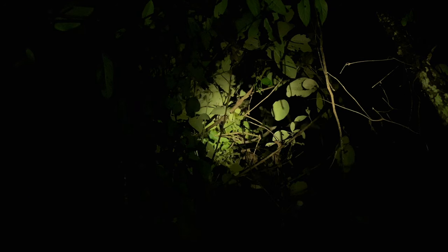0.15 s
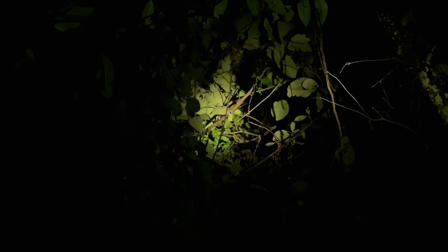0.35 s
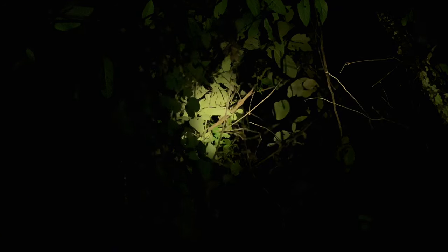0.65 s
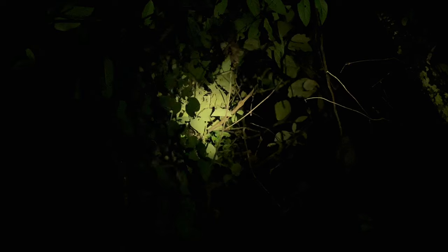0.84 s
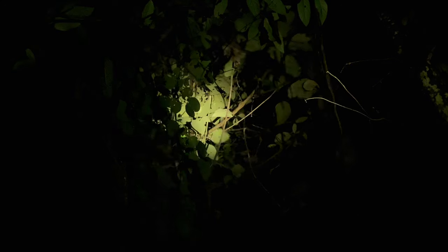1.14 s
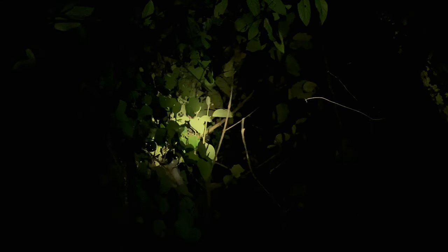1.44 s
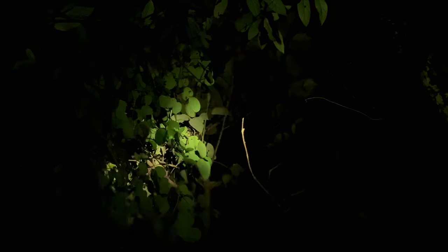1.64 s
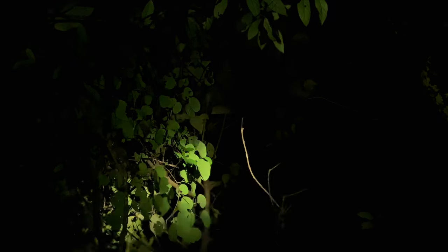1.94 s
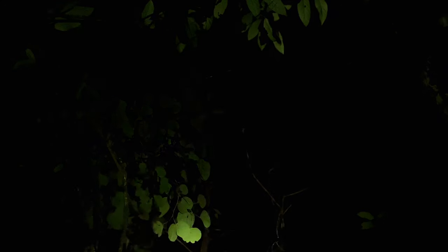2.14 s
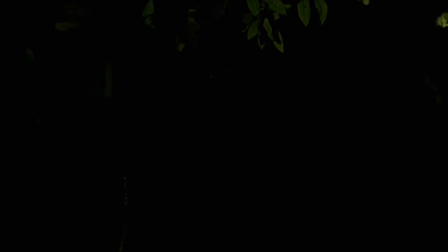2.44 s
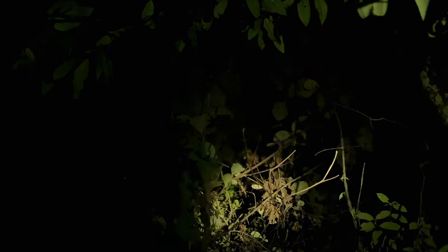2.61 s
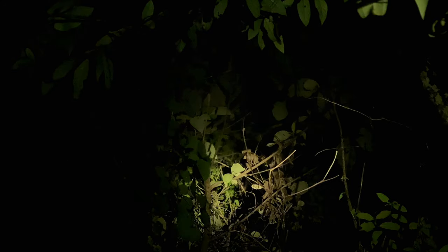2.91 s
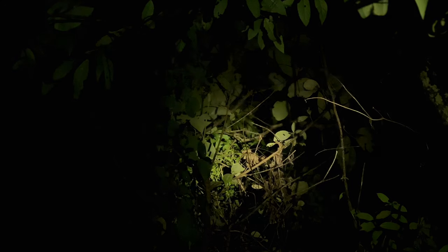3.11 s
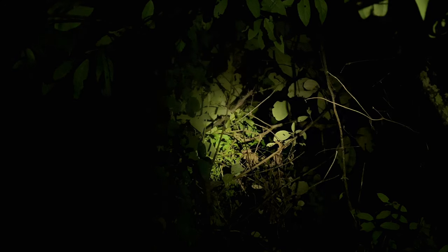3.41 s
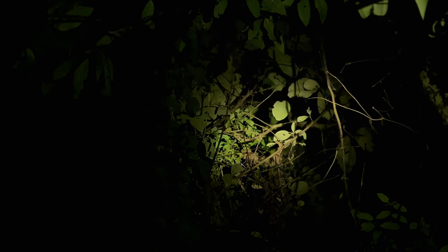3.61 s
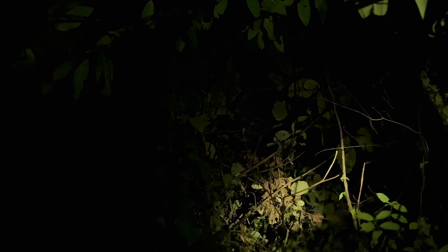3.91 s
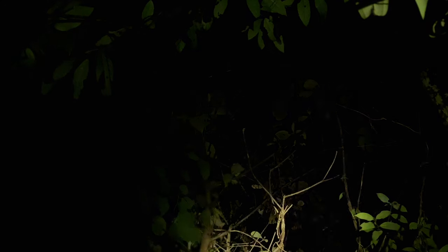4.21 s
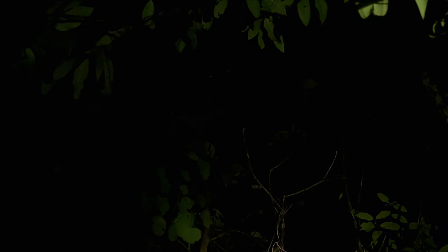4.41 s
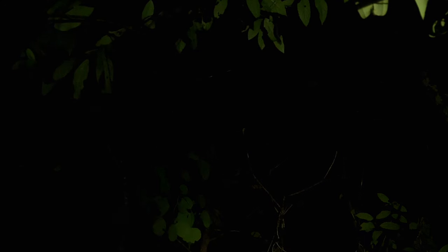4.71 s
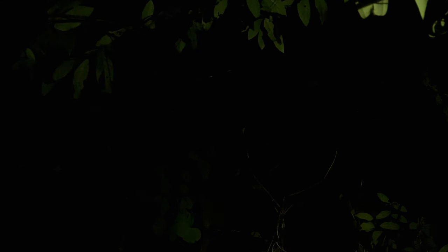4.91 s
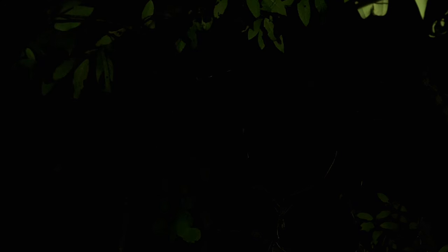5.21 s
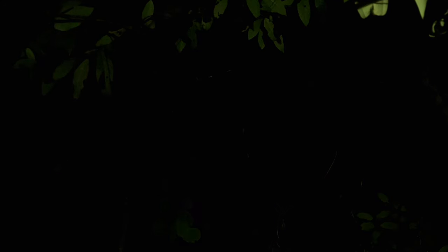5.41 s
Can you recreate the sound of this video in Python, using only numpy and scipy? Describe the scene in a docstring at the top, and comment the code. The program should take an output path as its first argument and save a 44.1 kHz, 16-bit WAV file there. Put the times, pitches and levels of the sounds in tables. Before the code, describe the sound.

In a dark forest, something pushes through undergrowth near the microphone: dry leaves swish and crackle, stems flick, wood knocks once and twigs snap, one very sharply just before two seconds. Around two and a half seconds the rustling stops short. Crickets chirp quickly throughout, with a fast katydid rasp and a shimmering high insect choir over soft night air.

```python
"""A forest at night. Tree crickets (swelling tones) chirp near 3 kHz, a choir of higher insects (wandering tones)
swells and sinks, a lower buzz and one thin whine join in, and a katydid rasps tooth clicks about six times a second.
At first something pushes through the undergrowth close by: leaves rustle as filtered slips and crackles, wood
knocks in decaying modes and twigs snap as noise bursts, one with a sharp crack.
Shortly before halfway the rustle stops short and the insects sing on alone over a soft night noise."""
import sys
import numpy as np
from scipy import signal
from scipy.fft import rfft, irfft, next_fast_len
from scipy.io import wavfile
from scipy.ndimage import uniform_filter1d, map_coordinates

SR = 44100
rng = np.random.default_rng(int(sys.argv[2]) if len(sys.argv) > 2 else 0)


def waveform_to_disk(signal):
    """Save audio, clipped to [-1, 1], as 16-bit WAV at the path in sys.argv[1]."""
    frames = np.transpose(np.atleast_2d(signal))
    scaled = np.clip(frames, -1, 1) * 32767
    samples = np.round(scaled).astype(np.int16)
    wavfile.write(sys.argv[1], SR, samples)


N = 244734
TIME = np.arange(N) / SR

# colour of the night air: pitch_hz, relative level_db
NIGHT_COLOUR = [(20, -20), (45, -5), (85, 1.5), (250, -1.5), (600, -6.5), (1450, -13.5), (1900, -1),
                (2450, 0.5), (3400, 1), (4500, 2), (7600, 11), (9700, 8), (12000, -3.5), (15700, -8.5)]

# groups of distant crickets: pitch_hz, spread_hz, level_db before the shared swell
FAR_CRICKETS = [(2742, 36, -52.5), (2793, 32, -52.5), (2906, 45, -58.5), (2976, 8, -48.5)]
# the swell they share: start_s, gain_db
FAR_SWELL = [(0, -10.5), (.4, -3.5), (1.3, -3), (2.2, -1), (5.55, -0.5)]

# the high choir starts a new phrase: start_s
CHOIR_PHRASES = [-.45, .17, .78, 1.38, 1.97, 2.55, 3.13, 3.76, 4.39, 5.02, 5.66]
# its wing resonances, before it follows the distant swell: low_hz, top_hz, width_hz, crest_level_db,
# crest_place (share of the phrase, 0-1), rest_loss_db
CHOIR_RESONANCES = [(1820, 2110, 350, -65, 0.61, 10.5), (5127, 5880, 660, -48, 0.29, 3),
                    (5834, 6080, 1300, -45, 0.49, 4.5), (6836, 7050, 1130, -51, 0.58, 3.5),
                    (13000, 13300, 3300, -59.5, 0.76, 4)]
# single trills that stand out of it: pitch_hz, mid_phrase_level_db before it follows the distant swell
CHOIR_TRILLS = [(5097, -63), (5415, -63), (5535, -56.5), (5667, -55.5), (5745, -57), (5842, -53),
                (5982, -55.5), (6128, -58), (6292, -59)]
CHOIR_FOLLOWS = .3   # share of the distant crickets' swell, in dB
CHOIR_TURN = .75   # share of a phrase after which the pitch turns down again

BUZZ_CREST_S, BUZZ_PERIOD_S = 3.39, 1.04
BUZZ_CREST_DB, BUZZ_REST_LOSS_DB = -50, 6.5

# leaves slide all the while something moves through them: start_s, level_db
LEAF_SLIDE = [(0, -41), (.22, -42), (.4, -43), (.72, -41.5), (.86, -46.5), (1.02, -47.5), (1.15, -43),
              (1.31, -45), (1.45, -39), (1.7, -43), (1.88, -41), (2.05, -41.5), (2.3, -38), (2.48, -41.5),
              (2.58, -40)]
# each push against a branch adds a swish: crest_s, level_db, attack_s, release_s
BRANCH_PUSHES = [(.03, -37.5, 0.017, 0.027), (.16, -35.5, 0.031, 0.029), (.455, -38, .01, 0.028),
                 (.59, -30, 0.024, 0.026), (.672, -36, 0.025, 0.034), (1.075, -39.5, .008, 0.046),
                 (1.18, -42, .01, 0.021), (1.47, -37, .008, 0.023), (1.642, -32, 0.0044, 0.017),
                 (1.78, -38, .02, 0.044), (1.942, -30.5, 0.0033, 0.0097), (2.52, -37.5, .008, 0.047)]
# colour of the leaves: pitch_hz, relative level_db
LEAF_COLOUR = [(20, -50), (60, -10.5), (120, -9.5), (220, -1), (340, -2.5), (480, -1), (650, -3),
               (1500, -1.5), (3500, -2), (6000, -9.5), (9000, -9.5), (12000, -11.5), (15700, -13.5)]
# their crispness: start_s, treble_db
LEAF_CRISPNESS = [(0, -1), (.35, -7), (.65, 0), (1.1, 3.5), (1.5, 0.5), (2.05, 4), (2.58, 2.5)]
RUSTLE_END_S = 2.606

# near crickets chirp in steady runs, values before chance: first_s, last_s, period_s, first_level_db,
# last_level_db, first_pitch_hz, last_pitch_hz, stroke_length_s
CHIRP_RUNS = [(.076, .256, .18, -40.5, -39, 3003, 3003, 0.011),
              (.493, 2.01, .095, -37.5, -34, 3005, 3004, 0.014),
              (2.156, 5.469, .095, -36.5, -37, 2984, 3000, .011),
              (.52, .93, .14, -42, -42, 2980, 2980, .016), (4.634, 4.92, .095, -40, -44, 2770, 2856, 0.015),
              (5.008, 5.5, .098, -32.5, -34, 2905, 2930, 0.016)]
CHIRP_SPREAD_DB, CHIRP_JITTER_S, CHIRP_SAG_HZ = 1.66, .002, 22
SOFT_STROKE_GAP_S, SOFT_STROKE_DB = .024, -14.5   # a soft stroke comes before and after the main one
FLUTTER_DB, FLUTTER_HZ = 0.76, 110   # the wing scrapes unevenly

KATYDID_FIRST_S, KATYDID_PERIOD_S, KATYDID_RESUME_S = .094, .1703, 2.712
KATYDID_DB = -46   # at the top of a rasp
# colour of its tooth clicks: pitch_hz, relative level_db
KATYDID_COLOUR = [(6500, -35), (8000, -5.5), (8450, -2.5), (8850, -6.5), (9550, 1.5), (10300, -4.5),
                  (11300, -9), (12500, -22), (15500, -33)]

# stems and leaves flick and bump: start_s, onset_level_db, tone_hz, decay_s (to -60 dB)
STEM_FLICKS = [(.157, -31, 1160, 0.054), (.269, -33.5, 900, 0.028), (.448, -32, 1200, 0.027),
               (.464, -31, 1510, 0.021), (.573, -33, 1200, 0.054), (.587, -29.5, 1500, 0.041),
               (.668, -33.5, 900, .039), (1.179, -32, 2500, .021), (1.386, -30.5, 1500, .031),
               (1.466, -28.5, 1740, 0.047), (1.541, -30, 2500, .02), (1.899, -27.5, 6000, .012),
               (1.909, -26, 755, .03), (1.916, -22, 240, .07), (2.259, -26.5, 4500, 0.02),
               (2.526, -24.5, 3000, .018), (2.702, -58.5, 1050, .041)]
KNOCK_S = 1.634
# modes of the knocked wood: pitch_hz, onset_level_db, decay_s (to -60 dB)
WOOD_MODES = [(210, -31.5, 0.073), (500, -31, 0.033), (947, -18.5, 0.023), (1256, -16, 0.026),
              (2000, -22, 0.022), (2370, -21, 0.023), (3270, -25, 0.031), (4400, -30.5, 0.022),
              (5500, -24, 0.012)]
# twigs break: start_s, crack_level_db, tone_hz, crack_decay_s, tail_level_db (before flutter),
# tail_decay_s (both decays to -60 dB)
TWIG_SNAPS = [(1.8825, -11, 8400, 0.0045, -31.5, 0.23), (1.9374, -9.5, 11300, 0.0082, -20, 0.34),
              (2.508, -21, 910, 0.015, -30.5, 0.098), (2.5533, -20, 4500, 0.014, -42, 0.092)]

WHINE_START_S, WHINE_LENGTH_S, WHINE_CREST_DB = 3.25, .85, -60.5
WHINE_TOP_HZ, WHINE_RISE_HZ, WHINE_SETTLE_S = 11420, 1270, .17

CUTOFF_HZ = 15720


def from_db(db):
    """Turns decibels into a plain gain."""
    return 10 ** (np.asarray(db) / 20)


def rms_one(x):
    """Scales a sound to unit average strength."""
    return x / np.sqrt(np.mean(x ** 2) + 1e-20)


def in_time(rows):
    """The columns of a curve at every sample."""
    s, *columns = np.transpose(rows)
    return [np.interp(TIME, s, c) for c in columns]


def drift(rate_hz):
    """Random wander around zero, in straight lines between chance points."""
    knots = rng.standard_normal(N // 8)
    path = map_coordinates(knots, [TIME * 2 * rate_hz], order=1, mode="wrap")
    return path * np.sqrt(3 / 2)   # back to a spread of about 1


def coloured(x, spectrum):
    """Shapes a sound's spectrum by a colour curve; rms 1."""
    hz, db = np.transpose(spectrum)
    size = next_fast_len(N)
    bins = np.maximum(np.arange(size // 2 + 1) * SR / size, 1)
    gain = from_db(np.interp(np.log(bins), np.log(hz), db))
    return rms_one(irfft(rfft(x, size) * gain, size)[:N])


def band(x, low_hz, high_hz, order=1):
    """A causal band-pass."""
    edges = [max(low_hz, 10), min(high_hz, .45 * SR)]
    return signal.sosfilt(signal.butter(order, edges, "band", fs=SR, output="sos"), x)


def turn(hz):
    """Running phase of a frequency, in radians."""
    return 2 * np.pi * np.cumsum(hz + np.zeros(N)) / SR


def swarm(hz, width_hz):
    """Many wings near one pitch add up to a tone of wandering phase and strength; rms 1."""
    smooth = signal.butter(4, width_hz / 2, fs=SR, output="sos")
    a, b = signal.sosfilt(smooth, rng.standard_normal((2, N)))
    phase = turn(hz)
    return rms_one(a * np.cos(phase) + b * np.sin(phase))


def grains(per_s, spread_db):
    """Random clicks, uneven in size when given a spread; rms 1."""
    sizes = from_db(spread_db * np.minimum(rng.exponential(1, N), 4))
    signed = sizes * rng.choice([-1, 1], N)
    return rms_one(signed * (rng.random(N) < per_s / SR))


def add(out, s, sound):
    """Places a short sound at its time."""
    i = int(np.clip(round(s * SR), 0, N - 1))
    out[i:i + len(sound)] += sound[:N - i]


def dying(t60):
    """Half a second of decay, falling 60 dB in t60 seconds."""
    return np.exp(-np.log(1000) * TIME[:SR // 2] / t60)


def burst(low_hz, high_hz, t60, order=1):
    """A run of tiny slips that starts at once and dies, heard through one band."""
    slips = rng.choice([-1., 1.], SR // 2)
    return rms_one(band(slips, low_hz, high_hz, order=order)) * dying(t60)


def forest(x, t60):
    """Trunks and leaves scatter a sound into a diffuse tail of equal power."""
    tail = signal.fftconvolve(x, rng.standard_normal(SR // 2) * dying(t60))[:N]
    return rms_one(tail) * np.std(x)


def night_air():
    """A steady, soft noise lies under everything."""
    return from_db(-50) * coloured(rng.standard_normal(N), NIGHT_COLOUR)


def far_crickets():
    """Each distant cricket strokes at its own pace and arrives as scattered sound."""
    out = 0
    for hz, spread_hz, db in FAR_CRICKETS:
        group = 0
        for place in np.linspace(-1, 1, 3):
            stroke = turn(24 * (1 + .3 * drift(3))) + rng.uniform(0, 2 * np.pi)
            pitch = hz + spread_hz * (place + .5 * drift(2)) + 16 * np.cos(stroke)
            opening = np.maximum(np.sin(stroke) + 0.28, 0)
            group = group + opening * np.sin(turn(pitch))
        group = rms_one(forest(group, t60=0.082))
        # together they hold a steady level
        recent_power = uniform_filter1d(group ** 2, size=6000)
        out = out + from_db(db) * group / np.sqrt(recent_power + .05)
    return out * from_db(in_time(FAR_SWELL)[0])


def choir():
    """The high insects swell in phrases, their pitch climbing then turning down; tooth strikes roughen them."""
    progress = np.interp(TIME, np.sort(CHOIR_PHRASES), np.arange(len(CHOIR_PHRASES))) % 1
    climb = np.interp(progress, [0, CHOIR_TURN, 1], [0, 1, 0])
    mass = 0
    for low_hz, top_hz, width_hz, db, crest, lost_db in CHOIR_RESONANCES:
        slack = np.sin(np.pi * (progress - crest)) ** 4
        pitch = low_hz + (top_hz - low_hz) * climb
        mass = mass + from_db(db - lost_db * slack) * swarm(pitch, width_hz)
    trills = sum(from_db(db) * swarm(hz, width_hz=18.7) for hz, db in CHOIR_TRILLS)
    trill_swell = from_db(-5 * np.cos(np.pi * progress) ** 2)
    roughness = rms_one(from_db(0.79 * drift(250)))
    song = mass * roughness + trills * trill_swell
    # it grows louder along with the distant crickets
    return song * from_db(CHOIR_FOLLOWS * in_time(FAR_SWELL)[0])


def buzzer():
    """A lower insect buzzes in slow, even swells."""
    slack = np.sin(np.pi * (TIME - BUZZ_CREST_S) / BUZZ_PERIOD_S) ** 2
    return from_db(BUZZ_CREST_DB - BUZZ_REST_LOSS_DB * slack) * swarm(4402, width_hz=1075)


def leaf_motion():
    """Strength of the rustle: sliding plus a quick rise and release for each push, added in power."""
    power = from_db(in_time(LEAF_SLIDE)[0]) ** 2
    for s, db, attack_s, release_s in BRANCH_PUSHES:
        swish = np.exp(np.minimum((TIME - s) / attack_s, (s - TIME) / release_s))
        power = power + (from_db(db) * swish) ** 2
    return np.sqrt(power)


def rustle():
    """Leaves slide and crinkle: a dense hiss with single crackles in it, which stops short."""
    friction = 0
    edges = np.geomspace(30, 16000, 9)
    for low_hz, high_hz in zip(edges, edges[1:]):
        # leaves of each size catch and slip on their own
        slips = 0.65 * rng.standard_normal(N) + grains(per_s=2200, spread_db=2.5)
        friction = friction + band(slips * from_db(2.0 * drift(30)), low_hz, high_hz, order=2)
    leaves = coloured(friction * from_db(1.06 * drift(90)), LEAF_COLOUR)
    # a reflection from close by, 4.1 ms late, ripples the colour
    reflection = np.interp(TIME - .0041, TIME, band(leaves, 24, 3000))
    leaves = rms_one(leaves + 0.24 * reflection)
    treble = signal.sosfilt(signal.butter(1, 3000, "high", fs=SR, output="sos"), leaves)
    # drier leaves sound brighter
    leaves = leaves + (from_db(in_time(LEAF_CRISPNESS)[0]) - 1) * treble
    stop = np.clip((RUSTLE_END_S - TIME) / 0.013, 0, 1)
    return leaf_motion() * leaves * stop


def cricket(first_s, last_s, period_s, first_db, last_db, first_hz, last_hz, length_s):
    """Chirps of one strong wing stroke between two soft ones, each a tone that swells, fades and sags in pitch."""
    out, t = np.zeros(N), TIME[:SR // 10] - 1 / 20
    count = round((last_s - first_s) / period_s) + 1
    chirps = np.linspace((first_s, first_db, first_hz), (last_s, last_db, last_hz), count)
    for (s, db, hz), (late, force) in zip(chirps, rng.standard_normal((count, 2))):
        for place, (detune, phase) in zip((-1, 0, 1), rng.standard_normal((3, 2))):
            pitch = hz + 5 * detune - CHIRP_SAG_HZ * np.tanh(t / length_s)
            level_db = db + CHIRP_SPREAD_DB * force + SOFT_STROKE_DB * abs(place)
            envelope = from_db(level_db) * np.exp(-(t / length_s) ** 2)
            stroke = envelope * np.sin(2 * np.pi * (np.cumsum(pitch) / SR + phase))
            crest_s = s + CHIRP_JITTER_S * late + SOFT_STROKE_GAP_S * place
            add(out, crest_s - 1 / 20, stroke)
    return out * from_db(FLUTTER_DB * drift(FLUTTER_HZ))


def near_crickets():
    """A close singer and a rival, heard early and again late from a lower pitch, with the forest's echo."""
    song = sum(cricket(*run) for run in CHIRP_RUNS)
    return song + from_db(-9.5) * forest(song, t60=0.35)


def katydid():
    """Two evenly spaced series of rasps, each rasp a run of tooth clicks that swells and dies away."""
    first_series = KATYDID_FIRST_S + KATYDID_PERIOD_S * np.arange(15)
    second_series = KATYDID_RESUME_S + KATYDID_PERIOD_S * np.arange(17)
    t, strokes = TIME[:SR // 5] - 1 / 10, np.zeros(N)
    for s in np.r_[first_series, second_series]:
        add(strokes, s - 1 / 10, np.exp(np.minimum(t / 0.029, -t / 0.041)))
    clicks = coloured(grains(per_s=7200, spread_db=0.0), KATYDID_COLOUR)
    return from_db(KATYDID_DB) * strokes * clicks


def stem_flicks(out):
    """Flicking stems and bumped leaves give short bursts of slips in a band."""
    for s, db, hz, t60 in STEM_FLICKS:
        add(out, s, from_db(db) * burst(hz / 2.25, hz * 1.64, t60, order=2))


def wood_knock(out):
    """A struck piece of wood rings in a few fast-dying modes under a short noisy contact."""
    for k, (hz, db, t60) in enumerate(WOOD_MODES):
        ring = np.sin(2 * np.pi * hz * TIME[:SR // 2]) * dying(t60)
        add(out, KNOCK_S, (-1) ** k * from_db(db) * ring)   # neighbouring modes start in opposite directions
    add(out, KNOCK_S, from_db(-25) * burst(700, 7000, t60=0.018))


def twig_snaps(out):
    """Each breaking twig gives a very short crack and a longer, wider tail."""
    for s, db, hz, t60, tail_db, tail_t60 in TWIG_SNAPS:
        add(out, s, from_db(db) * burst(hz / 1.46, hz * 1.3, t60, order=2))
        # the tail comes back unevenly from the trunks around
        echoes = from_db(1.5 * drift(349)[:SR // 2])
        add(out, s, from_db(tail_db) * echoes * burst(hz / 11, hz * 4, tail_t60))


def undergrowth():
    """Flicking stems, one woody knock and breaking twigs together."""
    out = np.zeros(N)
    stem_flicks(out)
    wood_knock(out)
    twig_snaps(out)
    return out


def whine():
    """One thin insect call that climbs and settles near its top pitch while it swells and fades."""
    age = np.clip(TIME - WHINE_START_S, 0, WHINE_LENGTH_S)
    pitch = WHINE_TOP_HZ - WHINE_RISE_HZ * np.exp(-age / WHINE_SETTLE_S)
    swell = np.sin(np.pi * age / WHINE_LENGTH_S)
    return from_db(WHINE_CREST_DB) * swell * swarm(pitch, width_hz=506)


def scene():
    """Lays the insects and the undergrowth over the night air, in one channel."""
    insects = far_crickets() + choir() + buzzer() + near_crickets() + katydid() + whine()
    return (night_air() + insects + rustle() + undergrowth())[None]


def record(dry):
    """The microphone loses the deepest bass; the top is cut steeply."""
    thin = signal.sosfilt(signal.butter(3, 48, "high", fs=SR, output="sos"), dry)
    return signal.sosfilt(signal.ellip(12, .1, 80, CUTOFF_HZ, fs=SR, output="sos"), thin)


dry = scene()
out = record(dry)
waveform_to_disk(out)
```